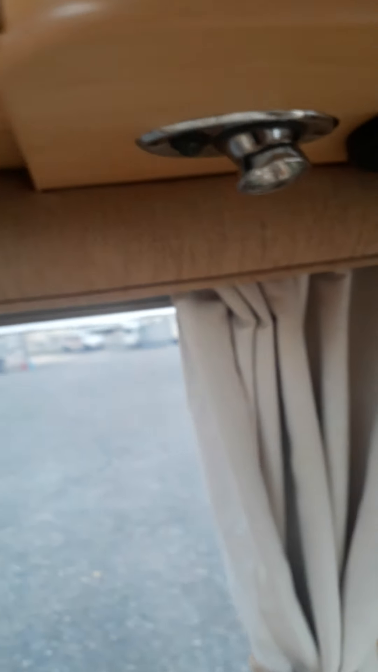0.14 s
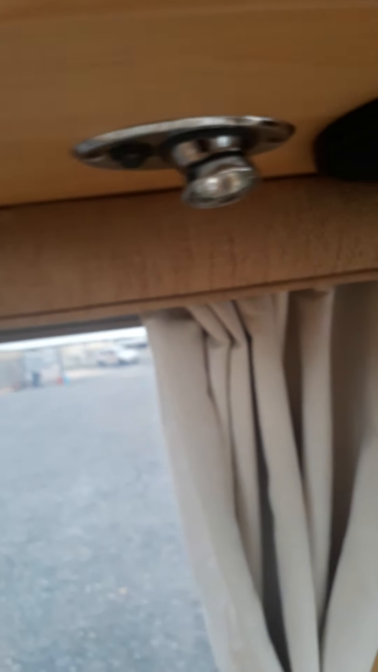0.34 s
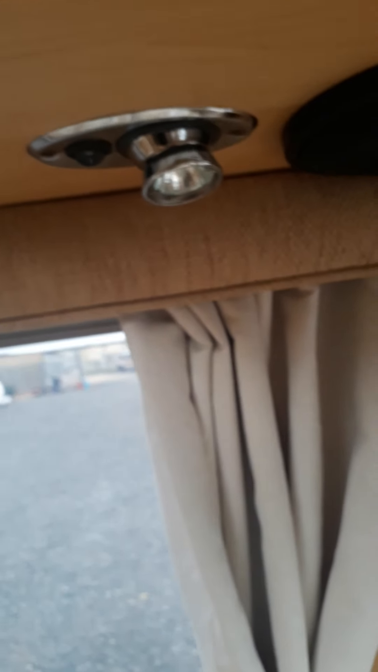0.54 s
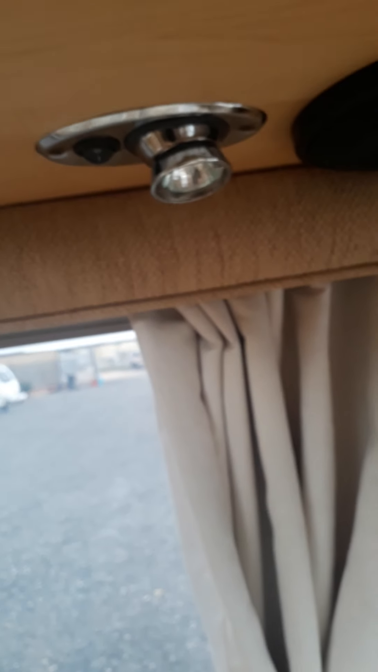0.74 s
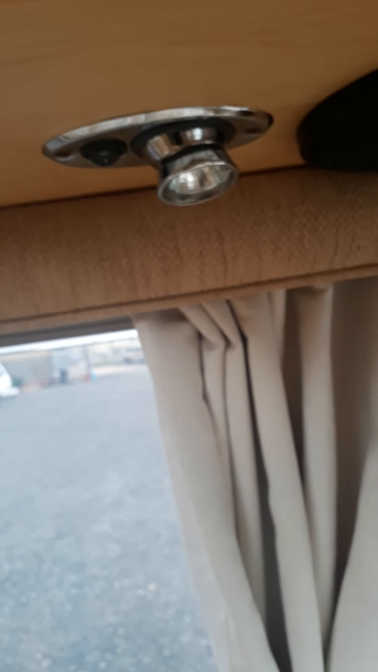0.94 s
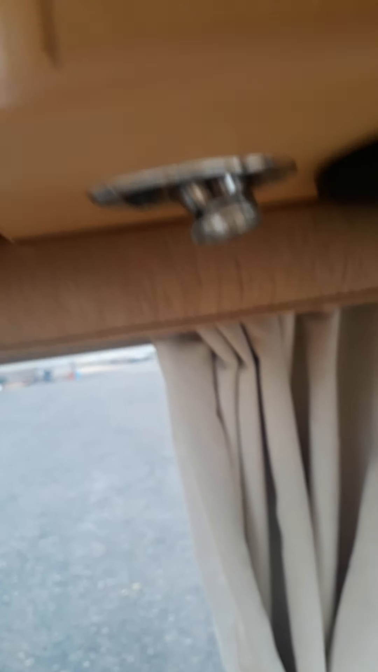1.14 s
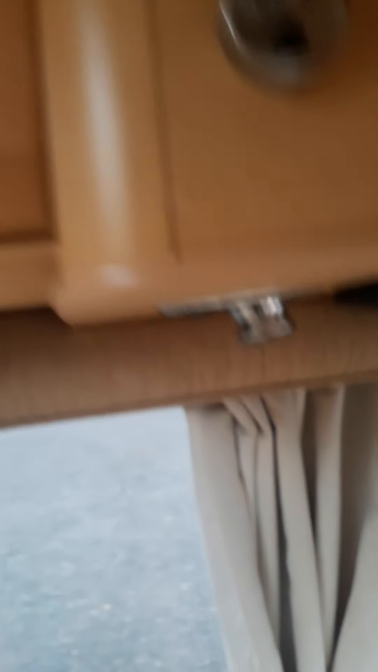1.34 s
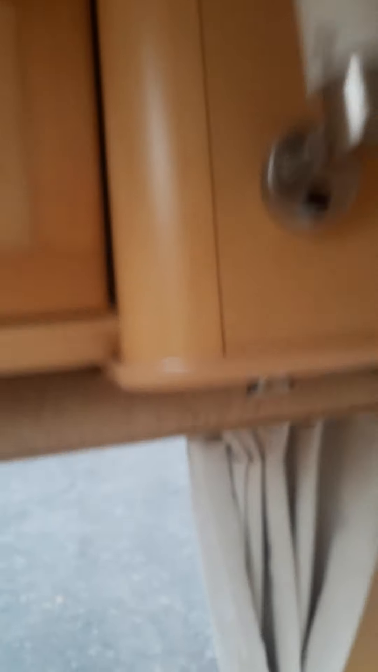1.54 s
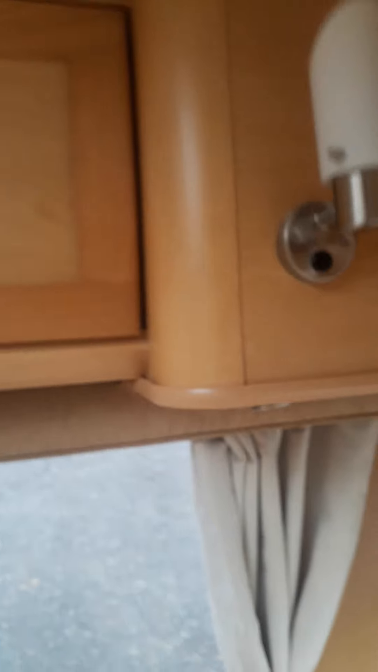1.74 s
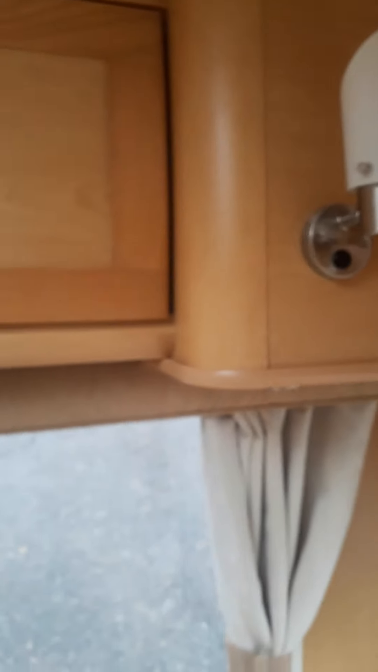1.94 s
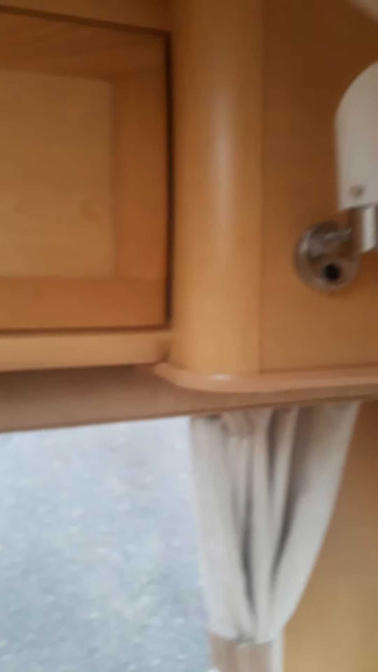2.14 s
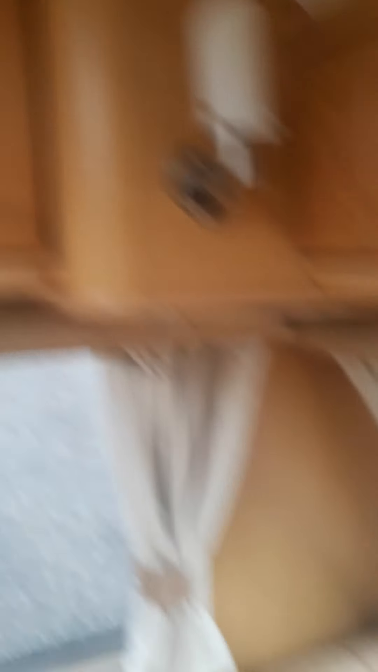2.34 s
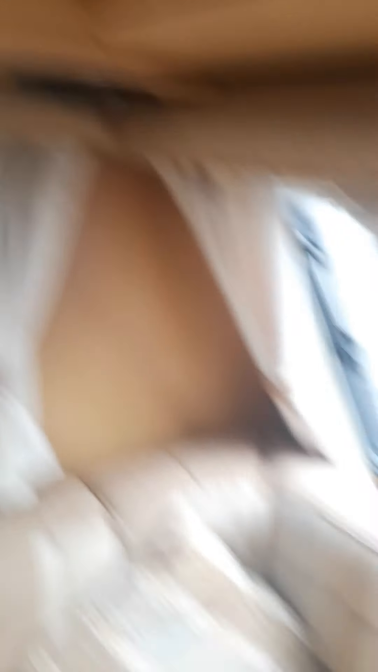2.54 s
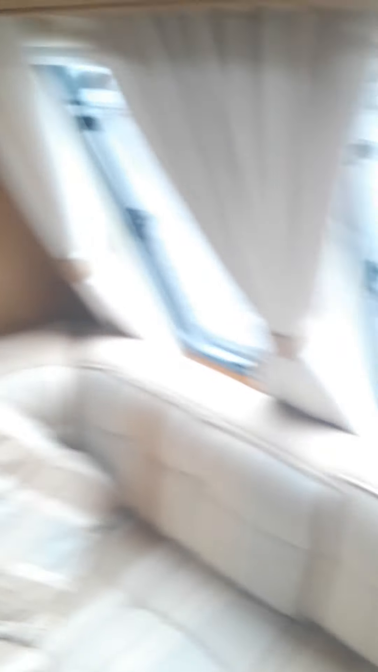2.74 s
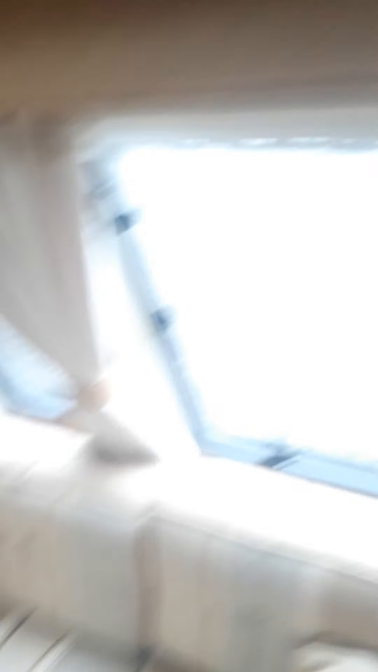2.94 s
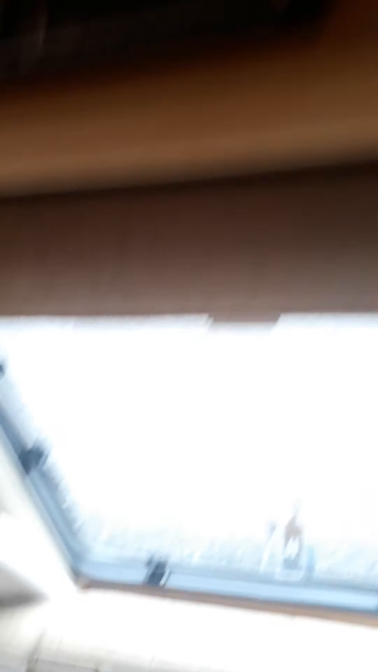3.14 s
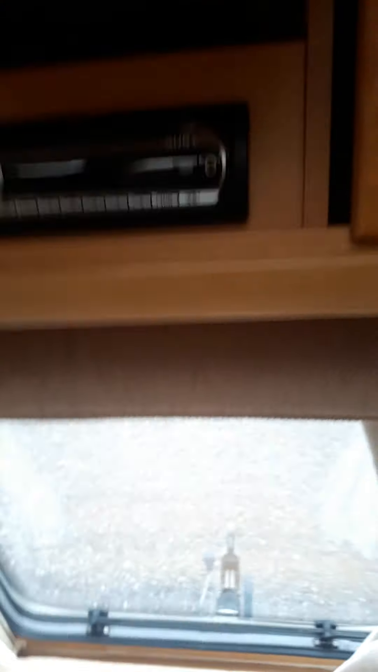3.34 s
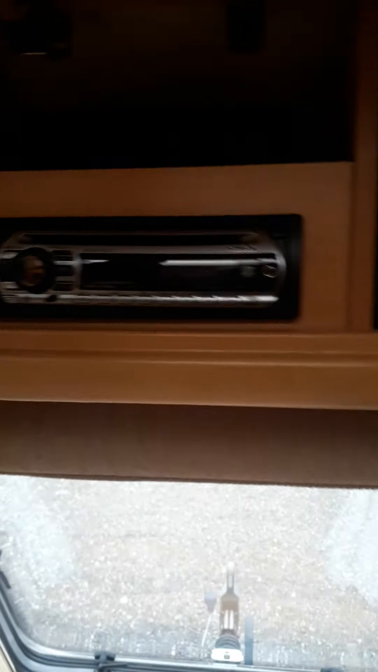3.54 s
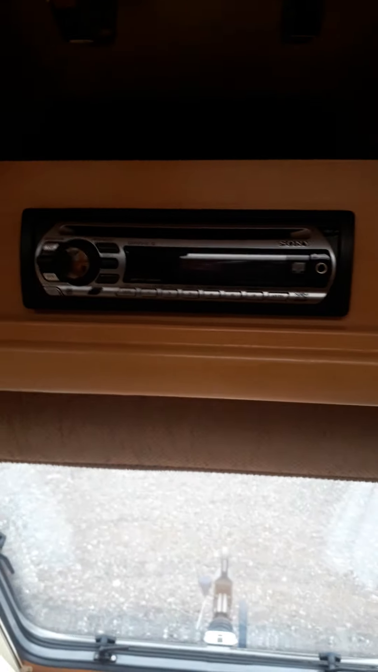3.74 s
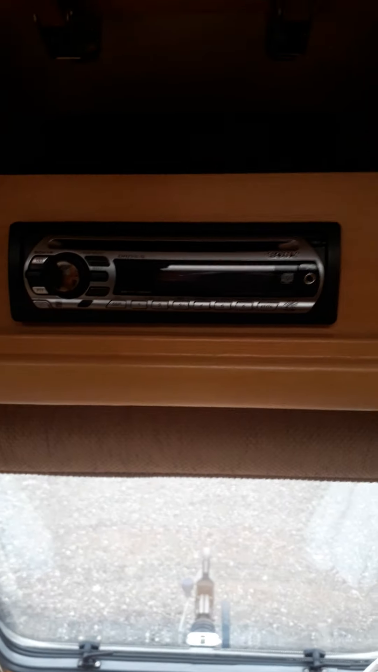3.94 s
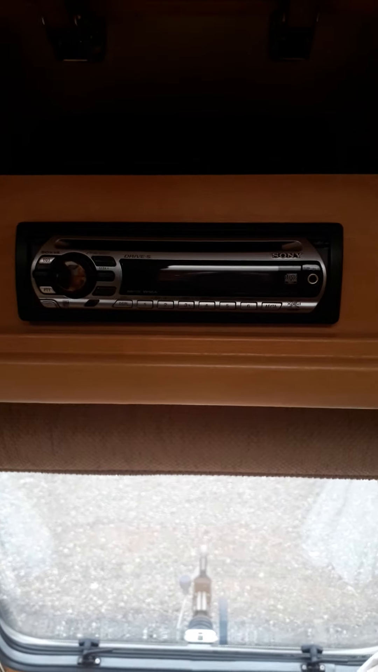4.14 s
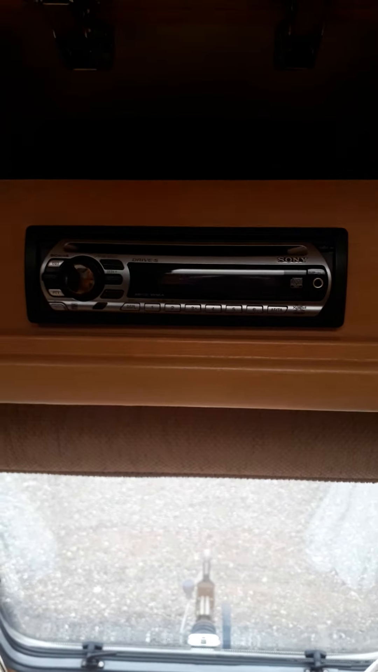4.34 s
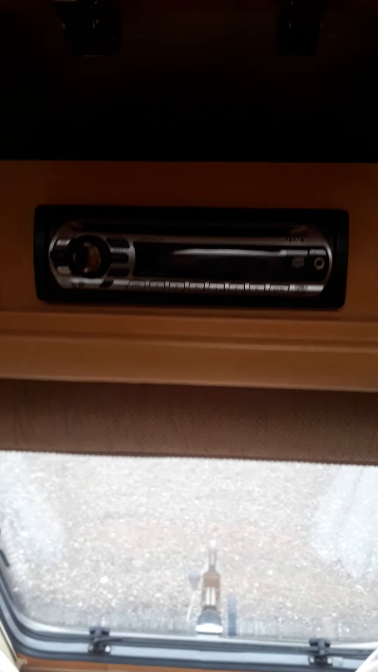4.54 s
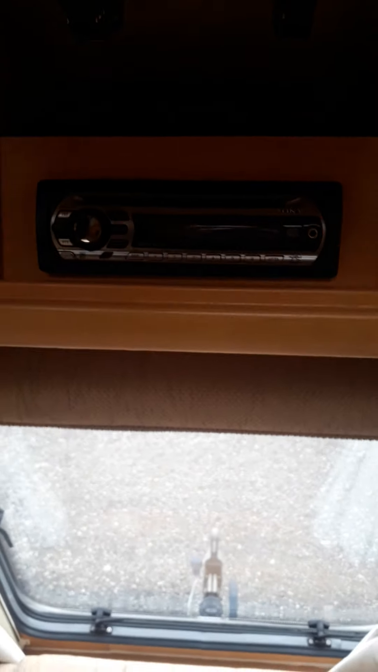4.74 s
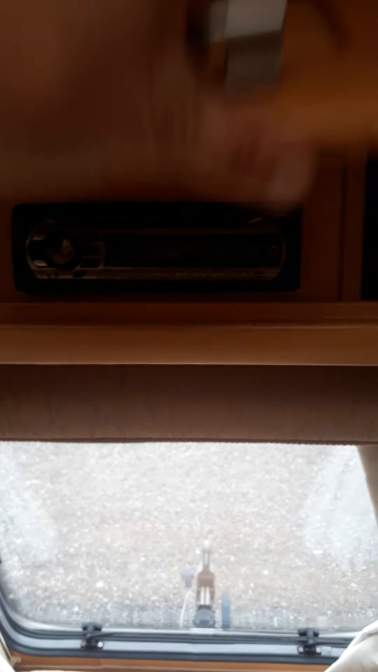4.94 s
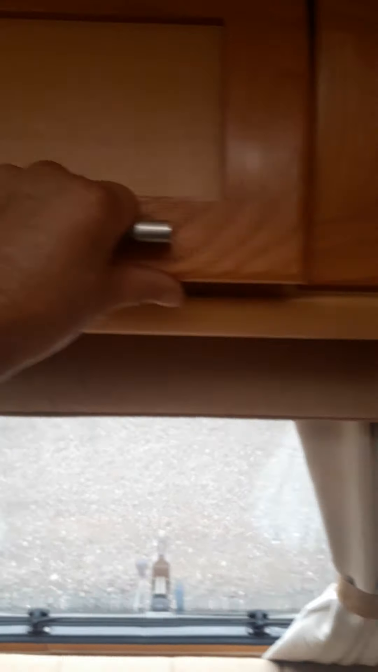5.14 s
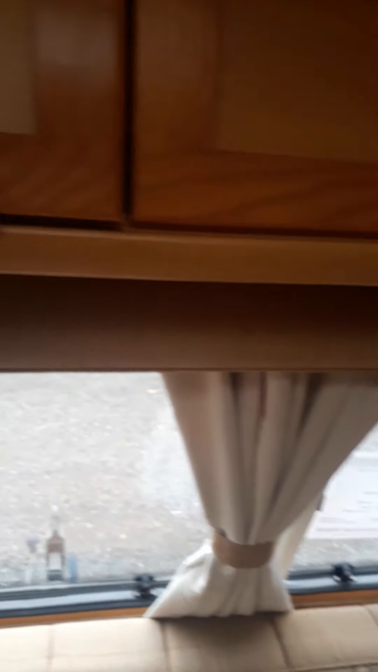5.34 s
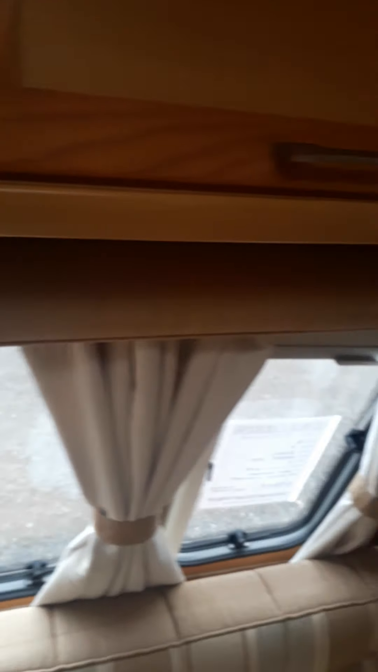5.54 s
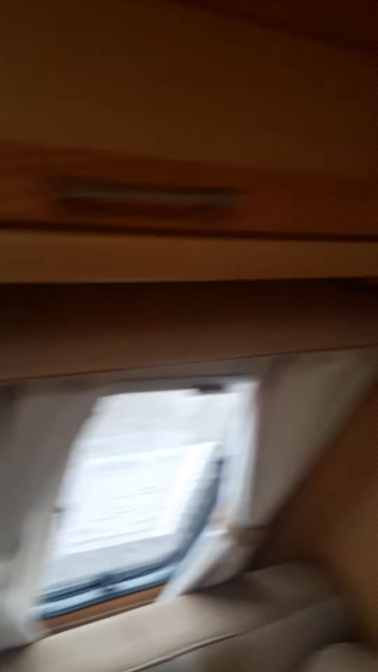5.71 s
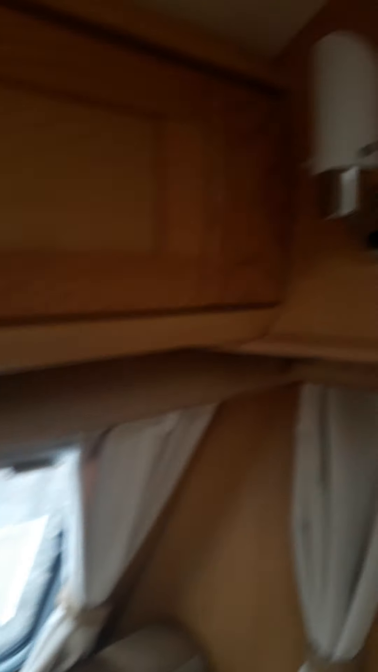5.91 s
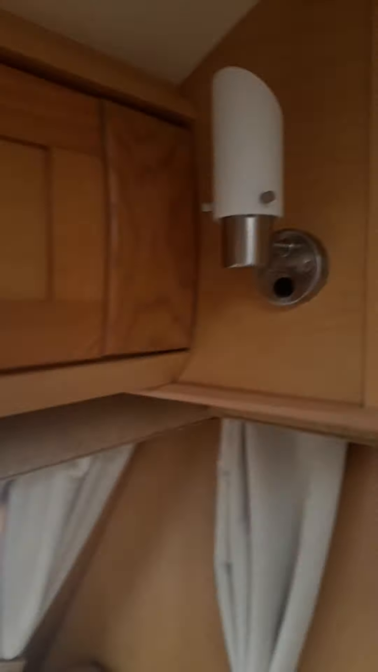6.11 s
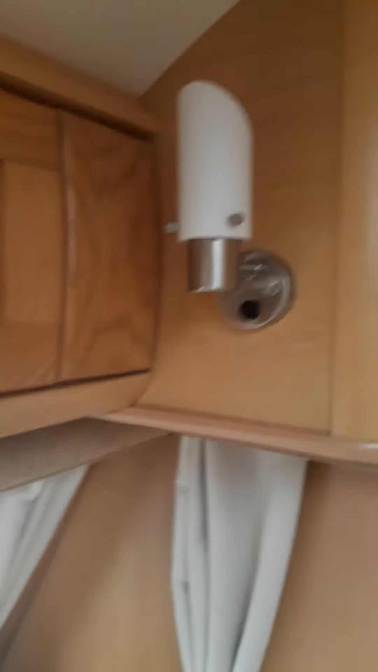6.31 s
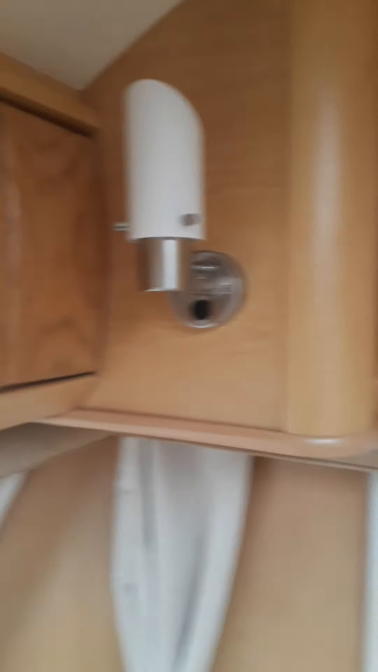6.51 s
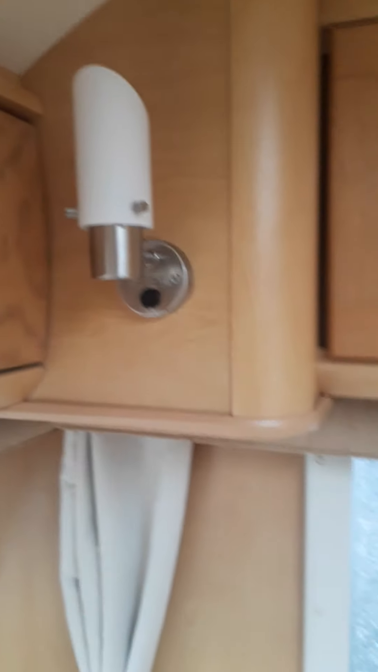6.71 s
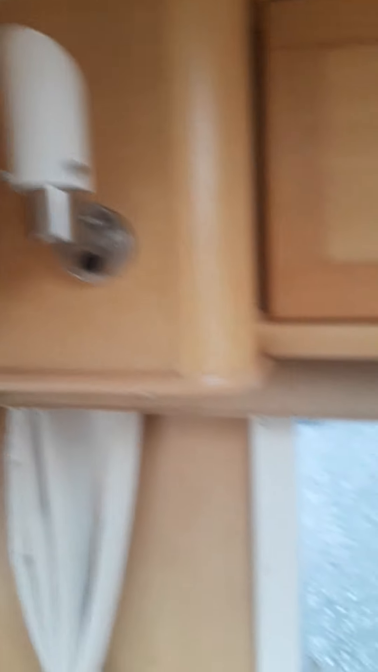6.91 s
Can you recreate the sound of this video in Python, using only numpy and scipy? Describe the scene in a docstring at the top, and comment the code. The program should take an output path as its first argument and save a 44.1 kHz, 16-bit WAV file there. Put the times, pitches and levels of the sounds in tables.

```python
"""Overhead locker doors shut in a small, soft-furnished caravan, heard at a two-port microphone carried about.
Throughout, filtered noise makes rumble, hum and far traffic; sleeves rub (slipping noise) and steps thud
(damped sines) at the start. The hum then sinks, and the traffic and a narrow drone in it rise.
From 2.5 s plywood doors knock (ringing modes and panel noise) and catches click (noise through resonances);
the hardest slam at 3.3 s ends in a bolt snap and two rebounds. More doors shut from 5 s, then clicks and rubs."""
import sys
import numpy as np
from scipy import signal
from scipy.fft import rfft, irfft
from scipy.io import wavfile

SR = 44100
rng = np.random.default_rng(int(sys.argv[2]) if len(sys.argv) > 2 else 0)


def put_to_file(sound):
    """Save the sound as 16-bit audio at rate SR, in the file named by the first command-line argument."""
    columns = np.atleast_2d(sound).T  # one column per channel
    safe = np.clip(columns, -1, 1)
    whole_steps = np.round(safe * 32767)
    wavfile.write(sys.argv[1], SR, whole_steps.astype(np.int16))


N = 307509
TAIL = 24576  # samples for which a hit is left to ring


def undb(db):
    """Decibels to gain."""
    return 10 ** (np.asarray(db) / 20)


def freqs(size):
    """Spectrum frequencies in Hz for a sound of this length, floored at 1 Hz."""
    return np.maximum(np.arange(size // 2 + 1) * SR / size, 1)


def along(points, hz):
    """Read (Hz, value) points on a log-frequency axis."""
    at_hz, value = np.transpose(points)
    return np.interp(np.log(hz), np.log(at_hz), value)


def shape(x, gain):
    """Filter by a gain per frequency."""
    return irfft(rfft(x) * gain, x.shape[-1])


def causal(gain):
    """Minimum-phase version of a gain: it rings only after the blow."""
    cepstrum = irfft(np.log(np.maximum(gain, 1e-6)))
    cepstrum[1:TAIL // 2] *= 2
    cepstrum[TAIL // 2 + 1:] = 0
    return np.exp(rfft(cepstrum))


def resonance(f, hz, q):
    """Response of one resonance."""
    return 1 / (1 + 1j * q * (f / hz - hz / f))


def blow(x):
    """Scale a hit to the energy of 10 ms at full level."""
    energy = np.mean(np.sum(x ** 2, axis=-1))
    return x / np.sqrt(energy / (SR / 100))


def add(out, s, x):
    """Mix a sound in at a time."""
    start = max(int(s * SR), 0)
    out[:, start:start + x.shape[-1]] += x[..., :max(N - start, 0)]


def decay(t, t60_s):
    """Exponential fade of 60 dB in t60_s."""
    return np.exp(-np.log(1000) * t / t60_s)


def waver(rate_hz):
    """Slow random wander of spread near 1, with a new target at the given rate."""
    return np.interp(np.arange(N) * rate_hz / SR, np.arange(N), rng.standard_normal(N))


def level_curve(points):
    """Gain over time from (s, dB) points."""
    return undb(np.interp(np.arange(N) / SR, *np.transpose(points)))


def diffuse(size, alike_hz=750):
    """Noise from all round: both ports hear much the same bass and unrelated treble."""
    alike = .985 / (1 + (freqs(size) / alike_hz) ** 2)
    mid, side = rng.standard_normal((2, size))
    common = shape(mid, np.sqrt(1 + alike))
    opposed = np.array([[1], [-1]]) * shape(side, np.sqrt(1 - alike))
    return (common + opposed) / np.sqrt(2)


def from_left(x, lag_s=0.00022):
    """A direct sound reaches the left port first."""
    port_lag_s = np.array([[0], [lag_s]])
    return shape(np.broadcast_to(x, (2, TAIL)), np.exp(-2j * np.pi * freqs(TAIL) * port_lag_s))


def ambience(layer):
    """Far sounds shift as the microphone is carried across the van: gain eases between two levels."""
    # background layers: before_db, after_db, halfway_s
    layer_levels = {"traffic": (-76, -72.5, 1.28), "hum": (-62.5, -76, 1.46), "drone": (-94, -74.5, 2.77)}
    before_db, after_db, halfway_s = layer_levels[layer]
    shift_s = 0.48
    moved = (1 + np.tanh((np.arange(N) / SR - halfway_s) / shift_s)) / 2
    return undb(before_db + (after_db - before_db) * moved)


def outside(waver_db=2.76, traffic_hz=830, traffic_q=0.75, traffic_waver_db=1.56, hum_hz=42, hum_q=9):
    """Rumble, a hum with its octave and far traffic wash come through thin walls; rumble and wash waver."""
    # rumble spectrum: freq_hz, density_db (per Hz, relative)
    rumble_spectrum = [(18, -32), (40, -0.5), (65, -2), (110, 2), (160, -3.5), (250, -7), (420, -15.5),
                       (800, -31), (2000, -42), (6000, -40.5)]
    # rumble level: time_s, level_db (before rumble_gain_db)
    rumble_levels = [(0.5, -61.5), (0.91, -71), (2.23, -69), (2.82, -61), (3.06, -61.5), (4.27, -64.5),
                     (5.22, -59.5), (6.37, -64.5), (6.97, -56.5)]
    rumble_gain_db = 0.5
    f = freqs(N)
    rumble = shape(diffuse(N), undb(along(rumble_spectrum, f)))
    traffic = shape(diffuse(N), resonance(f, traffic_hz, traffic_q) ** 2)
    hum_gain = resonance(f, hum_hz, hum_q) ** 2 + resonance(f, 2 * hum_hz, 2 * hum_q)
    hum = shape(rng.standard_normal(N), hum_gain)
    rumble_level = undb(rumble_gain_db) * level_curve(rumble_levels) * undb(waver_db * waver(7))
    traffic_level = ambience("traffic") * undb(traffic_waver_db * waver(12))
    return (rumble / rumble.std() * rumble_level
            + traffic / traffic.std() * traffic_level
            + hum / hum.std() * ambience("hum"))


def drone(hz=802, q=3.5, waver_db=5):
    """One narrow band of the far traffic, noise through two equal resonances, stands out and wavers."""
    x = shape(diffuse(N), resonance(freqs(N), hz, q) ** 2)
    return x / x.std() * ambience("drone") * undb(waver_db * waver(8))


def slips(size, grain, rate_hz):
    """Sliding contact grips and lets go: an uneven run of strong and weak moments."""
    steps = np.interp(np.arange(size) * rate_hz / SR, np.arange(size), rng.standard_normal(size))
    return np.exp(grain * steps)


def rub(rise_s, fall_s, hz, octaves, grain=0.26, slips_hz=170):
    """Cloth or hand slides in many small slips that swell and fade; the peak comes one TAIL in."""
    size = 2 * TAIL
    t, f = (np.arange(size) - TAIL) / SR, freqs(size)
    band = np.exp(-.5 * (np.log2(f / hz) / octaves) ** 2) / np.sqrt(f)
    x = shape(diffuse(size) * slips(size, grain, slips_hz), band)
    swell = np.exp(-(t / np.where(t < 0, rise_s, fall_s)) ** 2)
    return x / x.std() * swell


def rubs():
    """Sleeves and hands rub as the person turns: bursts of band-shaped noise."""
    # rubs: peak_s, rise_s, fall_s, level_db, centre_hz, width_octaves
    rub_rows = [(.27, 0.043, 0.11, -54.5, 400, 2.4), (.25, 0.14, 0.14, -67, 4850, 0.59),
                (2.25, 0.33, 0.62, -66.5, 6340, 0.79), (2.32, 0.034, 0.047, -61.5, 1910, 1.9),
                (2.96, 0.17, 0.14, -58.5, 3480, 3.3), (3.16, .044, 0.056, -68, 7900, .49),
                (4.62, 0.37, .15, -77.5, 450, 1.8), (5.08, 0.085, 0.047, -58, 790, 2.2),
                (5.499, 0.065, .045, -61.5, 3500, .85), (5.55, 0.1, 0.054, -57, 980, 0.44),
                (5.615, 0.042, 0.047, -64, 3600, 1), (5.97, 0.097, .12, -54.5, 2520, 1.6),
                (5.97, 0.052, 0.089, -60.5, 258, .44), (6.68, 0.15, 0.16, -68, 4540, 0.91),
                (6.72, .11, .1, -76, 10500, 0.063)]
    out = np.zeros((2, N))
    for s, rise_s, fall_s, db, hz, octaves in rub_rows:
        x = undb(db) * rub(rise_s, fall_s, hz, octaves)
        cut = max(TAIL - int(s * SR), 0)  # what would fall before the start
        add(out, s - TAIL / SR, x[:, cut:])
    return out


def thud(hz, t60_s, push_s=0.0033):
    """A soft push sets a hollow board swinging as a damped sine."""
    t = np.arange(TAIL) / SR
    push = 1 - np.exp(-(t / push_s) ** 2)
    return blow(np.sin(2 * np.pi * hz * t) * push * decay(t, t60_s))


def thuds(board_cycles=28):
    """Steps and knocks thud on hollow floor and walls, each board ringing for a set count of swings."""
    # thuds: start_s, level_db, pitch_hz
    thud_rows = [(.236, -31.5, 94.5), (.24, -41.5, 57.8), (.262, -41, 193), (0.284, -43, 107),
                 (.36, -45.5, 80.3), (2.331, -48.5, 40.4), (3.337, -39, 81.6), (4.459, -48, 108),
                 (4.968, -45, 197), (5.135, -46, 75.6), (5.507, -39, 106), (5.873, -52, 266)]
    out = np.zeros((2, N))
    for s, db, hz in thud_rows:
        add(out, s, undb(db) * thud(hz, board_cycles / hz))
    return out


def modes(table, scatter_db, detune):
    """Each blow lands elsewhere: damped sines share its force differently and shift slightly in pitch."""
    t = np.arange(TAIL) / SR
    chance = rng.standard_normal((len(table), 2))
    total = np.zeros(TAIL)
    for k, ((hz, db, t60_s), (a, b)) in enumerate(zip(table, chance)):
        swing = np.sin(2 * np.pi * hz * (1 + detune * b) * t)
        total += (-1) ** k * undb(db + scatter_db * a) * swing * decay(t, t60_s)
    return blow(total)


def van_tail():
    """Reflections in the van: noise bands that each die away in their own time."""
    # ring time of the van: freq_hz, t60_s
    van_t60 = [(100, 0.69), (500, 0.21), (2000, 0.21), (6000, 0.29), (15000, 0.22)]
    t, noise, f = np.arange(TAIL) / SR, diffuse(TAIL), freqs(TAIL)
    centres = np.array(van_t60)[:, 0]
    total = 0
    for share, (_, t60_s) in zip(np.eye(len(centres)), van_t60):
        band = shape(noise, along(np.c_[centres, share], f))
        total = total + band * decay(t, t60_s)
    return blow(total * (1 - np.exp(-t / 0.0084)))


def knock(contact_hz, bass_hz, panel_db, panel_s=0.016, room_db=-7):
    """Wood meets wood: cabinet modes and panels ring, and a softer contact leaves out the highs."""
    # plywood cabinet modes: freq_hz, level_db (relative), t60_s
    cabinet_modes = [(98.2, -4.5, 0.54), (119.8, 4, 0.13), (170.6, 5.5, 0.14), (208.2, -4.5, 0.17),
                     (340.3, -5.5, 0.2), (395.7, -10, 0.16), (559.6, -3, 0.097), (674, -8.5, 0.19),
                     (761, 2, 0.054), (898, -4, 0.097), (1296, -0.5, 0.053), (1318, -3, 0.1),
                     (1570, -34, 0.069)]
    # crowded modes of the thin panels: freq_hz, density_db (per Hz, relative)
    panel_spectrum = [(50, -27), (110, 0.5), (200, 3), (300, 0.5), (385, -2.5), (480, -9), (610, -3),
                      (1050, -6.5), (2000, -9), (5000, -7.5), (15000, -22.5)]
    t, f = np.arange(TAIL) / SR, freqs(TAIL)
    direct = blow(from_left(diffuse(TAIL, alike_hz=1150)) * np.exp(-t / panel_s))
    panels = direct + undb(room_db) * van_tail()
    panels = blow(shape(panels, causal(undb(along(panel_spectrum, f)))))
    cabinet = from_left(modes(cabinet_modes, scatter_db=1.5, detune=.004))
    contact = 1 / np.sqrt((1 + (f / contact_hz) ** 4) * (1 + (bass_hz / f) ** 4))
    return blow(shape(cabinet + undb(panel_db) * panels, causal(contact)))


def bump(contact_hz):
    """The harder the contact of wood on wood, the less bass and the more panel."""
    soft_hz, soft_bass_hz, soft_panel_db = 397, 126.5, -3.5
    bass_oct_per_oct, panel_db_per_oct = 0.45, 3
    hardness_oct = np.log2(contact_hz / soft_hz)
    bass_hz = soft_bass_hz * 2 ** (bass_oct_per_oct * hardness_oct)
    return knock(contact_hz, bass_hz, soft_panel_db + panel_db_per_oct * hardness_oct)


def bumps():
    """Lighter bumps of wood on wood, brighter where the contact is harder."""
    # bumps: start_s, level_db, contact_cutoff_hz
    bump_rows = [(.268, -46, 296), (.427, -51, 433), (.56, -57, 323), (1.822, -54, 590),
                 (2.840, -43.5, 480), (2.862, -46, 320), (2.936, -48.5, 540), (3.308, -34, 1020),
                 (3.343, -35.5, 560), (3.375, -37, 302), (3.464, -38.5, 213), (4.603, -49.5, 350),
                 (4.985, -43, 266), (5.089, -40.5, 304), (5.239, -54.5, 900), (5.530, -40, 280)]
    out = np.zeros((2, N))
    for s, db, contact_hz in bump_rows:
        add(out, s, undb(db) * bump(contact_hz))
    return out


def click(ring_hz, ring_db, slope_db, contact_s, ring_q=18, near_db=-9, near_s=0.016, room_db=-12, plate_db=-8):
    """The bolt scrapes and snaps over its keeper; the catch rings and nearby panels throw it back."""
    # catch spectrum: freq_hz, gain_db (relative)
    catch_spectrum = [(300, -6), (1000, -6), (2700, -2), (4800, -8), (7000, 0.5), (10000, -6),
                      (15000, -11.5)]
    # steel catch and plate modes: freq_hz, level_db (relative), t60_s
    plate_modes = [(1340, 2, 0.11), (1980, 3, 0.13), (2270, -9, 0.082), (2620, -2, 0.3), (2660, 3.5, 0.027),
                   (3300, -3, 0.1), (3630, 7, 0.029), (7600, -5, .08)]
    t, f = np.arange(TAIL) / SR, freqs(TAIL)
    # a long contact builds up in small slips, a short one is a single snap
    force = np.sqrt(t) * np.exp(-1.4 * t / contact_s) * slips(TAIL, grain=.55, rate_hz=900)
    snap = blow(from_left(diffuse(TAIL, alike_hz=2220), lag_s=0.000352) * force)
    near = blow(diffuse(TAIL) * t * np.exp(-2 * t / near_s))
    x = snap + undb(near_db) * near + undb(room_db) * van_tail()
    treble_db = slope_db * np.log2(np.maximum(f / 2000, 1))  # slope in dB per octave
    crack = shape(x, causal(undb(along(catch_spectrum, f) + treble_db)))
    ring = shape(x, resonance(f, ring_hz, ring_q))
    plate = from_left(modes(plate_modes, scatter_db=3, detune=.002), lag_s=.00035)
    plate = plate * (1 - np.exp(-t / contact_s))
    return blow(blow(crack) + undb(ring_db) * blow(ring) + undb(plate_db) * plate)


def doors():
    """The catch scrapes, the edge strikes the frame, then the door's weight lands and its leaf swings."""
    # door shuts: edge_s, edge_db, contact_cutoff_hz, catch_ahead_s, catch_db, catch_treble_db_per_octave,
    # weight_behind_s, weight_db, leaf_hz, leaf_db
    door_rows = [(2.552, -36, 1215, .005, -52, -2, .007, -39, 294, -38.5),
                 (2.736, -39, 980, 0.0092, -46, -5, 0.0093, -42.5, 275, -46),
                 (3.019, -45, 1140, .010, -44, -3.5, 0.011, -46, 274, -56.5),
                 (3.318, -25, 1360, 0.00023, -33.5, -3, 0, -18.5, 227, -32.5),
                 (5.015, -43, 2070, .005, -43.5, -21, .017, -36, 211, -36),
                 (5.128, -44, 1350, .002, -63, -14, 0.0028, -41, 204, -33.5),
                 (5.506, -43, 1110, .004, -50.5, -12, 0, -47, 278, -37.5)]
    scrape_s, scrape_ring_hz, scrape_ring_db = 0.014, 2176, -8.5
    # contact cut-off at the usual level; it doubles with every doubling_db of force
    usual_weight_hz, usual_db, doubling_db = 378, -35, 40
    weight_bass_hz, weight_panel_db, leaf_cycles = 78.5, -8.5, 21
    out = np.zeros((2, N))
    for (s, edge_db, contact_hz, ahead_s, catch_db, slope_db,
         behind_s, weight_db, leaf_hz, leaf_db) in door_rows:
        weight_hz = usual_weight_hz * 2 ** ((weight_db - usual_db) / doubling_db)
        scrape = click(scrape_ring_hz, scrape_ring_db, slope_db, scrape_s)
        weight = knock(weight_hz, weight_bass_hz, weight_panel_db)
        add(out, s - ahead_s, undb(catch_db) * scrape)
        add(out, s, undb(edge_db) * bump(contact_hz))
        add(out, s + behind_s, undb(weight_db) * weight)
        add(out, s + behind_s, undb(leaf_db) * thud(leaf_hz, leaf_cycles / leaf_hz))
    return out


def clicks():
    """Catches click: the duller the click, the more of it is ring of the catch and its plate."""
    # catch clicks: start_s, level_db, ring_hz, treble_db_per_octave, contact_s
    click_rows = [(2.822, -52.5, 4230, 9, 0.00061), (2.845, -53.5, 2160, 0, .005),
                  (2.861, -55, 8350, 4, .005), (2.905, -50.5, 3670, -3, 0.0018),
                  (2.933, -48.5, 4320, -2, 0.0053), (2.944, -47, 4750, 3, 0.0042),
                  (2.968, -49, 4800, 1.5, 0.0036), (3.196, -58.5, 7510, 2, 0.00073),
                  (3.301, -39, 2070, -7.5, 0.0066), (3.309, -33.5, 6400, -2, .004),
                  (3.658, -63, 5950, 7, 0.0013), (4.545, -60, 6200, -1.5, .0015),
                  (5.492, -49, 2770, -8, 0.0035), (6.037, -46.5, 2580, -6.5, 0.011),
                  (6.070, -48.5, 3170, -6, 0.0034), (6.071, -47, 2100, -20, 0.014)]
    out = np.zeros((2, N))
    for s, db, ring_hz, slope_db, contact_s in click_rows:
        ring_db = -10 - 1.67 * slope_db
        plate_db = -8 - 0.65 * slope_db
        add(out, s, undb(db) * click(ring_hz, ring_db, slope_db, contact_s, plate_db=plate_db))
    return out


def bolt(count=2):
    """The bolt snaps home, jolts the door and rebounds in dull clacks, each sooner and weaker."""
    snap_s, snap_db, ring_db, wood_db = 3.3925, -28, -34, -31.5
    gap_s, gap_shrink, rebound_db, loss_db = .057, .86, -43, 7
    out = np.zeros((2, N))
    snap = click(ring_hz=2600, ring_db=-14.5, slope_db=-2.5, contact_s=0.0018,
                 plate_db=-14.5, room_db=-15, near_s=0.01)
    ring = click(ring_hz=3440, ring_db=1.5, slope_db=2.5, contact_s=0.0072,
                 ring_q=12, room_db=-11, near_s=.007)
    add(out, snap_s, undb(snap_db) * snap)
    add(out, snap_s, undb(ring_db) * ring)
    add(out, snap_s, undb(wood_db) * bump(contact_hz=1640))
    s = snap_s
    for k in range(count):
        s += gap_s * gap_shrink ** k
        clack = click(ring_hz=2130, ring_db=-5, slope_db=-18.5, contact_s=0.0018,
                      ring_q=6, plate_db=-14, near_db=-7.5)
        add(out, s, undb(rebound_db - k * loss_db) * clack)
    return out


def scene():
    """All that happens in the van."""
    return outside() + drone() + rubs() + thuds() + bumps() + doors() + clicks() + bolt()


def record(dry, port_hz=4080, left_db=-12, hiss_db=-76):
    """Two unlike microphone ports colour the sound; air rings in them over faint hiss; the top is cut."""
    # port colour: freq_hz, left_db, right_db
    ports = np.array([(49.7, 0.5, 1), (148, 1.03, -1.7), (685, 1.3, -2.5), (1590, -3, 0), (2770, -7, 0),
                      (3800, -2.5, 2), (4870, -6, 4.5), (6870, -3, -7.5), (9000, -3.5, -32),
                      (10800, 0.5, -19), (11900, 0.5, -10), (16000, 1.5, -12)])
    # microphone hiss: freq_hz, density_db (per Hz, relative)
    hiss_spectrum = [(1000, -9), (2100, 7), (3000, 4.5), (4800, 2), (7000, -1), (11000, 0.5), (15000, -1)]
    # narrow port hiss: time_s, level_db (before air_gain_db; left port lower by left_db)
    air_levels = [(0.0, -75.5), (0.21, -71.5), (1.05, -81.5), (1.42, -77), (2.7, -79.5), (2.83, -74.5),
                  (4.15, -87.5), (5.49, -85.5), (5.63, -77), (5.98, -82), (6.13, -77.5), (6.97, -77.5)]
    air_gain_db, air_waver_db, top_hz = 5, 1.5, 15850
    f = freqs(N)
    x = shape(dry, np.array([undb(along(ports[:, [0, c]], f)) for c in (1, 2)]))
    air = shape(rng.standard_normal((2, N)), resonance(f, port_hz, q=6) ** 2)
    air = air / air.std() * undb(air_gain_db + air_waver_db * waver(6.5)) * level_curve(air_levels)
    hiss = shape(rng.standard_normal((2, N)), undb(along(hiss_spectrum, f)))
    x = x + undb([[left_db], [0]]) * air + undb(hiss_db) * hiss / hiss.std()
    top_cut = signal.ellip(10, .2, 70, top_hz, fs=SR, output="sos")
    return signal.sosfilt(top_cut, x)


dry = scene()
out = record(dry)
put_to_file(out)
```